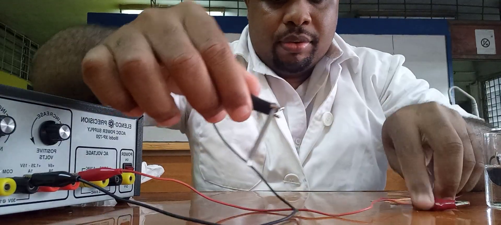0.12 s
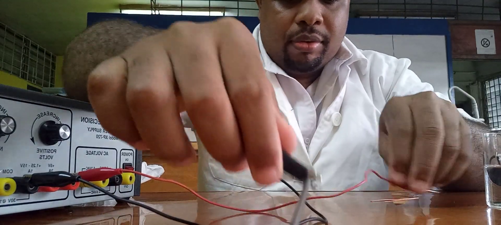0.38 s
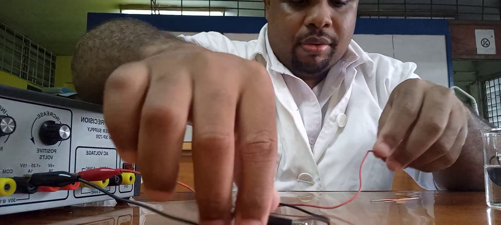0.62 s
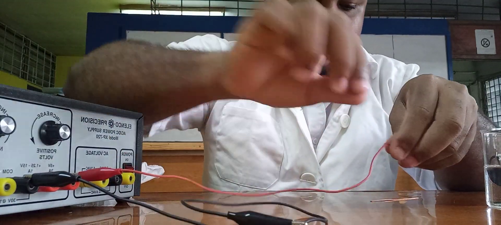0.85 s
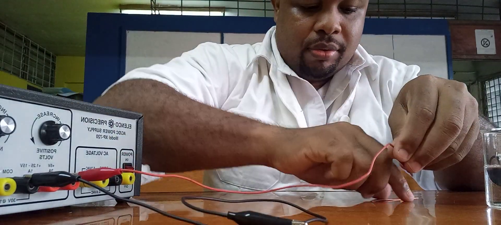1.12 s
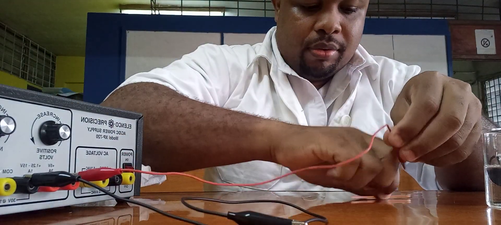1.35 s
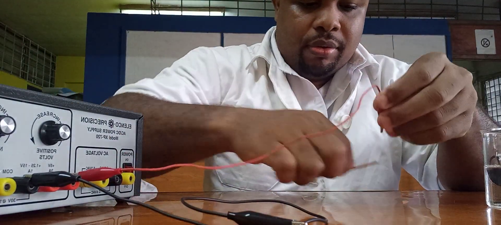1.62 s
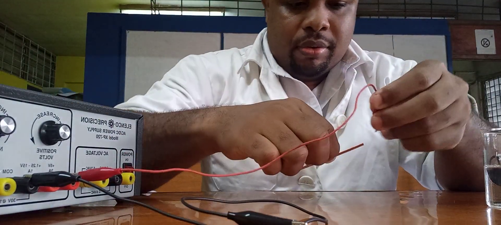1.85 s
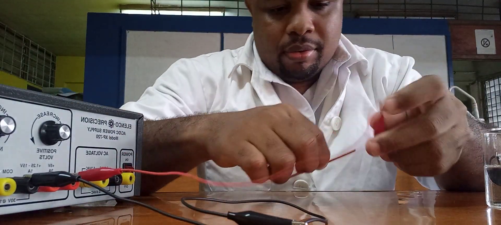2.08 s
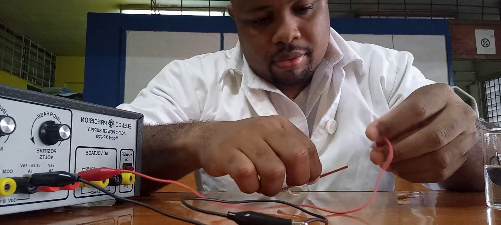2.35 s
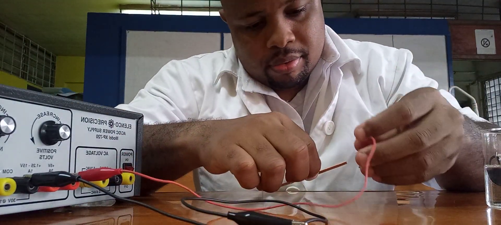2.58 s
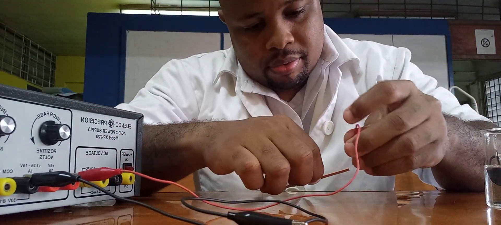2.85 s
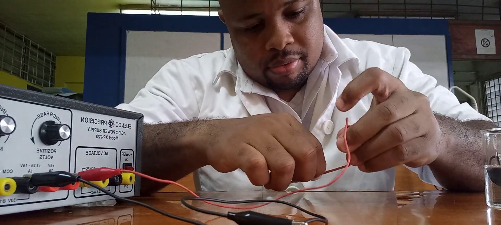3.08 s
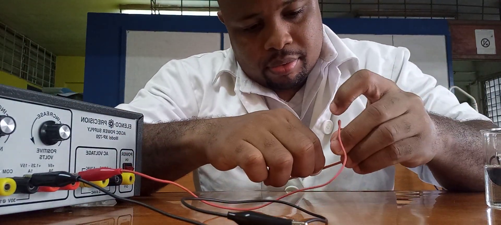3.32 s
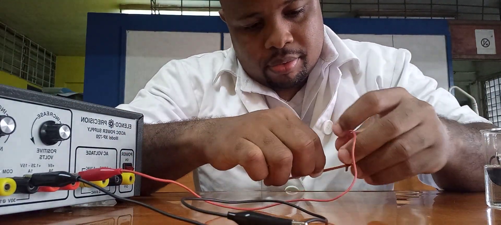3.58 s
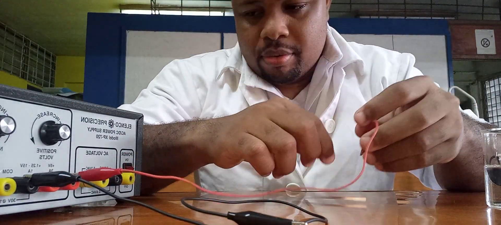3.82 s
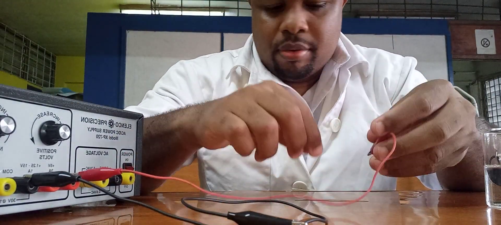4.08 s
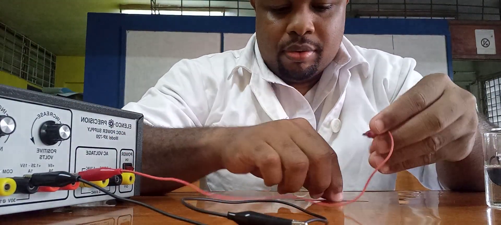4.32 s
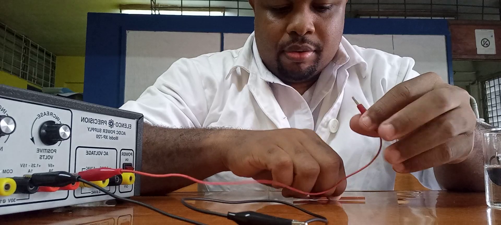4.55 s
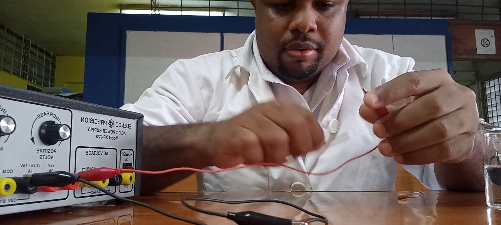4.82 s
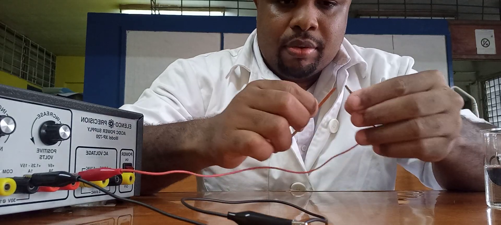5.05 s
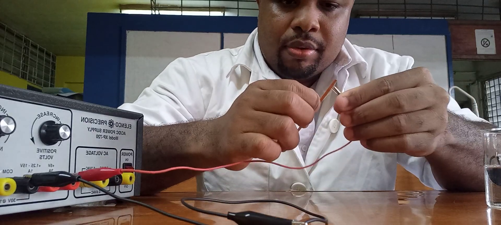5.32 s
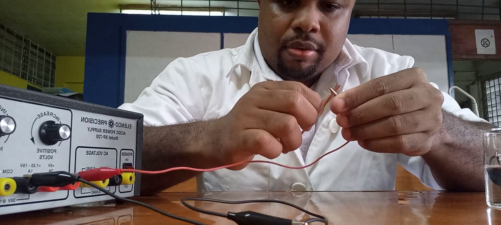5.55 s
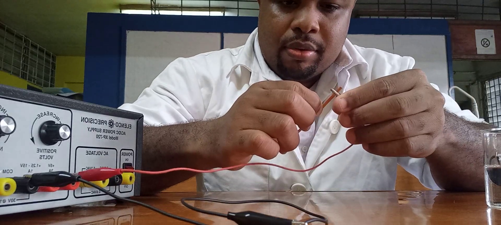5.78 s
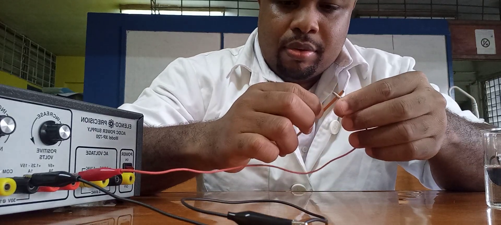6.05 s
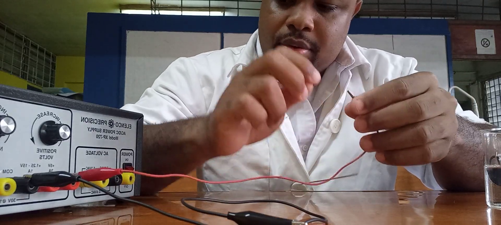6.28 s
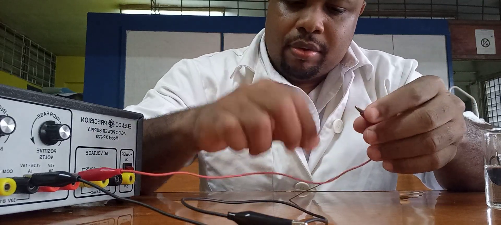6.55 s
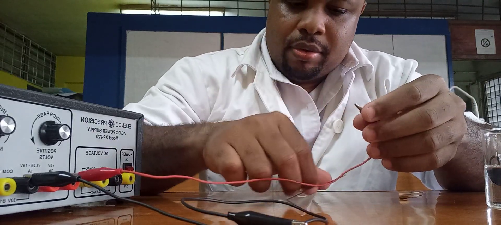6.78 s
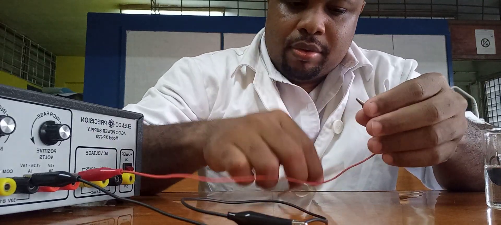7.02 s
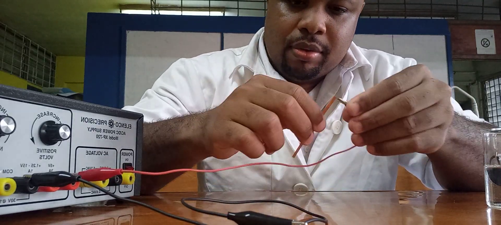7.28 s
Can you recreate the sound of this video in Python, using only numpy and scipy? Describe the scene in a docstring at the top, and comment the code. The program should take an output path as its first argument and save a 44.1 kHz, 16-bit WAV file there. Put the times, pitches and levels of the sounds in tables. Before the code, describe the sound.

A hard-walled lab room, with a stereo microphone close to a wooden bench. Low engine notes and soft tyre roar come through the walls throughout, over very faint hiss. At 0.3 s tiny metal ticks and a brief scrape; at 0.45 s a nail drops with a bright click and rapidly shrinking bounces, and at 0.57 s a clip knocks woodily. Small ticks and a light metal drag follow at 1.25-1.4 s, then barely audible handling around 1.8-2.2 s. From about 3 s a nearer engine slides down in pitch and settles into a throbbing idle. At 3.85-4.1 s a copper strip falls, with a loud sharp hit at 3.89 s, rattling and scraping. Faint ticks occur near 4.5 and 5.5 s. At 6.23 s clip jaws snap shut, the loudest and crispest click, with an echoing tail; smaller clicks follow at 6.5 s, then faint ticks and scraping until 7.1 s as the drone continues.

```python
"""A wooden lab bench in a hard room, with a phone in front of hands that work with test leads.
A clip and a nail drop, a copper strip falls and rattles, jaws snap shut and small parts tick: blows that excite
click and bench resonances, each louder one with a room tail of decaying noise. Dragged metal is chattering noise.
Street traffic drones and throbs through the walls: wavering sines over shaped noise, above a faint hiss."""
import sys
import numpy as np
from scipy import signal
from scipy.fft import rfft, irfft, next_fast_len
from scipy.io import wavfile
from scipy.ndimage import uniform_filter1d, map_coordinates

SR = 44100
rng = np.random.default_rng(int(sys.argv[2]) if len(sys.argv) > 2 else 0)


def gain_from_db(level_db):
    """Convert decibel levels to linear amplitude factors (20 dB per decade)."""
    decades = np.asarray(level_db, float) / 20
    return 10 ** decades


def int16_out(signal):
    """Quantize to a 16-bit WAV file."""
    q = np.round(np.clip(np.atleast_2d(signal).T, -1, 1) * 32767)
    wavfile.write(sys.argv[1], SR, q.astype(np.int16))


N = 326465  # length in samples

# Faint hiss, relative colour: freq_hz, density_db (per Hz)
HISS_COLOUR = [(1180, -30), (2000, -1), (2280, -6), (2770, -8), (3780, -14), (4160, -11), (5420, -18),
               (6470, -11), (7860, -25), (10500, -22), (11900, -19), (14100, -17), (15900, -21),
               (16500, -34)]
HISS_DB = -78  # rms
# Likeness of left and right in the noise layers: freq_hz, correlation (-1 to 1)
STEREO_LIKENESS = [(60, 0.85), (180, 0.91), (550, 0.52), (1650, -0.76), (4970, 0.73), (15000, 0.37)]

# A near engine slows down, then idles: time_s, pitch_hz, level_db
ENGINE_DRONE = [(2.6, 90.64, -65), (2.95, 88.18, -40.5), (3.07, 84.7, -44.5), (3.12, 85, -41),
                (3.26, 82.3, -44.5), (3.42, 74.39, -37), (3.7, 73.08, -41), (4.1, 71.92, -50.5),
                (4.4, 73.85, -39.5), (4.8, 73.04, -38), (5.2, 74.2, -46), (5.48, 71.83, -41),
                (5.64, 71, -50), (5.8, 72.97, -39.5), (6.18, 72.5, -46.5), (6.3, 73.62, -39),
                (6.62, 72.2, -50.5), (6.74, 73.33, -43), (7.0, 72, -55.5), (7.1, 70.3, -38.5),
                (7.4, 68.76, -39)]
# Engine notes passing by: start_s, end_s, pitch_hz, level_db
ENGINE_NOTES = [(0.146, 0.386, 87.5, -32.5), (0.535, 0.653, 83.5, -30), (0.882, 1.014, 93, -35.5),
                (1.088, 1.434, 93.2, -46.5), (1.496, 1.665, 93, -40.5), (2.298, 2.425, 92, -42),
                (2.437, 2.796, 83, -51), (4.207, 4.966, 83.8, -39), (0.136, 0.462, 123, -45),
                (3.306, 4.103, 115, -52.5), (4.687, 5.815, 147.8, -49), (5.024, 5.6, 357, -57.5),
                (5.787, 6.143, 189.4, -52.5), (6.011, 6.5, 120.8, -50.5), (6.723, 7.12, 164.3, -47),
                (7.198, 7.359, 903, -63)]
NOTE_FADE_S = 0.09
# Traffic roar: time_s, far_engines_db, tyres_db
ROAR_LEVELS = [(0, -41, -45.5), (.5, -45, -48), (.75, -48.5, -49), (1, -48, -51.5), (2.1, -54, -52),
               (2.8, -46.5, -54), (3.5, -41.5, -52.5), (4.1, -47, -50.5), (4.8, -40.5, -48.5),
               (5.6, -44.5, -48.5), (6.2, -44, -53), (6.45, -46.5, -50.5), (6.7, -48.5, -54.5),
               (7.1, -46.5, -55), (7.4, -43.5, -53)]
# Balance of the whole traffic: time_s, left_minus_right_db
TRAFFIC_BALANCE = [(0.0, -1), (1.6, -2), (2.7, -3), (3.4, -0.5), (7.4, -2)]
# Relative colour of the far engines: freq_hz, density_db (per Hz)
FAR_ENGINE_COLOUR = [(15, -54), (25, -37.5), (55, -7.5), (75, -2.5), (113, -4.5), (155, -9.5), (178, -16.5),
                     (246, -23), (356, -30), (400, -20.5), (520, -50.5), (880, -120)]
# Relative colour of the tyre roar: freq_hz, density_db (per Hz)
TYRE_ROAR_COLOUR = [(120, -33.5), (200, -3.5), (221, -3.5), (252, -8.5), (302, -3), (333, -3), (800, -18),
                    (1040, -60), (1760, -120)]
# Relative colour of the tyre swish: freq_hz, density_db (per Hz)
TYRE_SWISH_COLOUR = [(440, -29.5), (750, 0.5), (1370, -7), (1690, -15.5), (1830, -23.5), (2400, -36),
                     (3120, -58), (5280, -120)]
SWISH_DB, SWISH_SWING = -11, 1.2  # mean level against the tyre roar, and how much wider it swings

# Decay of the room: freq_hz, t60_s
ROOM_DECAY = [(300, .6), (1000, .64), (3000, .62), (7000, .58), (9000, .42), (15000, .34)]
# Colour the room adds to a blow: freq_hz, gain_db
ROOM_COLOUR = [(300, 6), (1000, 1.5), (2500, -3), (5000, -2), (8000, -2.5), (15000, -2)]

# Bright resonances of a click at the phone: freq_hz, width_hz, level_db
CLICK_BRIGHT = [(5300, 350, -5), (6300, 550, 0), (7100, 500, -7)]
# Highest resonances of a click, its sheen: freq_hz, width_hz, level_db
CLICK_SHEEN = [(9300, 1500, -3), (11900, 1600, 0), (13500, 1600, -1), (15200, 1400, -3)]
# Lowest resonances of a click, its clank: freq_hz, width_hz, level_db
CLICK_CLANK = [(2400, 420, 0), (2950, 600, -3)]
# Middle resonances of a click at the phone: freq_hz, width_hz, level_db
CLICK_MIDDLE = [(3500, 450, -4), (4250, 550, 0)]
# The loose nail rings more narrowly: freq_hz, width_hz, level_db
NAIL_RING = [(4350, 180, 0), (5620, 180, -3), (7000, 300, -5)]
# Wooden bench resonances: freq_hz, width_hz, level_db
BENCH_KNOCK = [(332, 110, -3.5), (560, 250, -6.5), (770, 260, -0.5), (1217, 200, -2), (2110, 280, -3)]

# Metal dragged on the bench: start_s, end_s, level_db, sheen_db, nail_ring_db
SCRAPES = [(.288, .37, -67, -9, -20), (1.25, 1.43, -61, -1, -20), (3.89, 4.12, -57, -4, -20),
           (1.8, 2.08, -72, -12, -20), (6.845, 6.965, -81, -12, 15), (6.945, 6.978, -77, 4, 12)]
# Small pure tick: start_s, pitch_hz, level_db, t60_s
PURE_TICKS = [(5.473, 3070, -48, 0.0098)]

# The nail drops, then bounces ever faster; each flight is BOUNCE_SHRINK times the one before
NAIL_DROP_S, NAIL_DROP_DB = 0.4483, -16.5
FIRST_FLIGHT_S, BOUNCE_SHRINK = 0.0226, 0.62
FIRST_LOSS_DB, NEXT_LOSS_DB, BOUNCE_TILT_DB = 11, 4, 7
# Clip on the bench: start_s, level_db, low_tilt_db
CLIP_KNOCKS = [(0.3814, -68.5, -1), (0.566, -22, -5), (0.5939, -35, 2), (0.6099, -43, 1)]
# Copper strip: start_s, level_db, low_tilt_db
STRIP_RATTLE = [(3.8454, -22, -1), (3.8866, -10.5, -4), (3.8948, -22, 2.5), (3.927, -23.5, -3),
                (3.9393, -31.5, 14.5), (3.961, -34.5, -0.5), (3.9704, -24.5, 6), (3.9945, -23, -4),
                (3.9999, -26.5, 0), (4.006, -31, 6.5), (4.0366, -20, -4.5), (4.0544, -24.5, -0.5),
                (4.0689, -36, -1), (4.0738, -28.5, 1), (4.0894, -36.5, 8.5)]
# Clip jaws: start_s, level_db, low_tilt_db
JAW_SNAPS = [(6.2282, -5, 3), (6.2446, -31.5, -4), (6.4666, -30.5, 8), (6.5183, -34.5, 1),
             (6.536, -37.5, 2)]
# Small parts: start_s, level_db, low_tilt_db
PART_TICKS = [(0.2918, -43, -2), (0.299, -50, 0), (0.3134, -52, 2), (0.3206, -46, 2), (0.717, -50, 2),
              (1.2527, -50, -2), (1.2758, -39, -3), (1.3004, -46, 0), (1.8885, -46, -12), (2.02, -63, 4),
              (2.105, -62, -2), (2.2228, -60, -6), (4.4348, -61, 2), (4.5243, -62, 0), (6.7171, -61, 0),
              (6.8694, -56, -2), (7.0608, -63, -8)]
# Shares of a blow against the bright resonances: knock_db, clank_db, middle_db, sheen_db
NAIL_SHARES, CLIP_SHARES, STRIP_SHARES = (2, -14.5, -1, 1), (17.5, -2, 7, 4.5), (-9.5, -9, -3.5, 1.5)
JAW_SHARES, TICK_SHARES = (-13, -8.5, -7, -9), (-1, -11.5, -2.5, -8)
SHARE_SCATTER_DB = 3.18

# Where the hands work: time_s, left_lag_ms, left_minus_right_db
HAND_PLACE = [(0.3, -0.36, -6), (0.452, 0.0089, 7.5), (.6, 0.015, -18), (1.3, -0.32, 4.5), (3.5, 0.39, 7.5),
              (4.499, 0.44, 4), (6.2, 0.23, -4.5), (6.899, 0.59, -15)]
# Near sounds at the two microphones: freq_hz, left_minus_right_db
MICROPHONE_BALANCE = [(60, 0.0), (110, 0.0), (200, 0.0), (380, 1.5), (700, -1.5), (1290, -9.0), (2380, 3.5),
                      (4400, 0.5), (8120, 3.5), (15000, -0.5)]
# Steep limit of the top treble: freq_hz, gain_db
TREBLE_LIMIT = [(15700, 0), (16000, -9), (16700, -16), (17000, -50)]


def unit(x):
    """Scales to rms 1."""
    return x / np.sqrt(np.mean(x ** 2) + 1e-20)


def peak_one(x):
    """Scales to peak 1."""
    return x / np.max(np.abs(x))


def along(points, hz):
    """Reads (freq_hz, value) points on a log frequency axis."""
    f, v = np.transpose(points)
    return np.interp(np.log(hz + 1), np.log(f + 1), v)


def curves(rows):
    """Draws one value per sample for each column after the time."""
    s, *cols = np.transpose(rows)
    return [np.interp(np.arange(N) / SR, s, c) for c in cols]


def wobble(rate_hz):
    """Draws a smooth random curve with rate_hz knots a second."""
    knots = rng.standard_normal(int(N * rate_hz / SR) + 4)
    return map_coordinates(knots, [np.arange(N) * rate_hz / SR])


def filtered(x, response):
    """Filters x by a complex response of frequency."""
    m = next_fast_len(x.shape[-1] + 8192)
    spectrum = rfft(x, m) * response(np.fft.rfftfreq(m, 1 / SR))
    return irfft(spectrum, m)[..., :x.shape[-1]]


def resonances(modes, scatter_db):
    """Causal response of damped modes of alternating sign, each struck at a new strength."""
    gains = [gain_from_db(db + scatter_db * rng.standard_normal()) for _, _, db in modes]

    def response(f):
        total = 0
        for k, (centre, width, _) in enumerate(modes):
            damping = 1j * f * width
            total = total + (-1) ** k * gains[k] * damping / (centre * centre - f * f + damping)
        return total
    return response


def rush(colour, patchy_db):
    """Coloured stereo noise of rms 1, with smooth patches of random gain over time and pitch."""
    z = signal.stft(rng.standard_normal((2, N)), nperseg=512)[2]
    patches = uniform_filter1d(rng.standard_normal(z.shape[1:]), size=5, axis=0)
    patches = uniform_filter1d(patches, size=12, axis=1)
    pair = signal.istft(z * gain_from_db(patchy_db * unit(patches)), nperseg=512)[1][:, :N]

    def mid_side_response(hz):
        angle = np.arccos(np.clip(along(STEREO_LIKENESS, hz), -1, 1)) / 2
        return gain_from_db(along(colour, hz)) * np.array([np.cos(angle), np.sin(angle)])
    mid, side = filtered(pair, mid_side_response)
    return unit(np.array([mid + side, mid - side]))


def hiss():
    """Steady faint noise, coloured across the spectrum."""
    return gain_from_db(HISS_DB) * rush(HISS_COLOUR, patchy_db=0.5)


def engines():
    """Sines whose level and phase wander at random, so the engine notes waver and throb."""
    t = np.arange(N) / SR
    hz, db = curves(ENGINE_DRONE)
    turns = np.cumsum(hz) / SR
    drone = gain_from_db(db + 1.5 * wobble(11)) * np.sqrt(2) * np.sin(2 * np.pi * turns + 0.9 * wobble(9))
    for start, end, note_hz, note_db in ENGINE_NOTES:
        ramp = np.clip(np.minimum(t - start, end - t) / NOTE_FADE_S, 0, 1)
        swell = np.sin(np.pi / 2 * ramp) ** 2
        level = gain_from_db(note_db + 1.2 * wobble(7)) * swell
        drone = drone + level * np.sqrt(2) * np.sin(2 * np.pi * note_hz * t + 0.48 * wobble(10))
    return drone


def traffic():
    """Engine notes over the noise of far engines, tyre roar and the wider-swinging tyre swish."""
    low_db, mid_db = curves(ROAR_LEVELS)
    swish_db = mid_db.mean() + SWISH_DB + SWISH_SWING * (mid_db - mid_db.mean())
    far_engines = gain_from_db(low_db + 1.7 * wobble(7.5)) * rush(FAR_ENGINE_COLOUR, patchy_db=1.0)
    tyre_roar = gain_from_db(mid_db + 0.23 * wobble(6.9)) * rush(TYRE_ROAR_COLOUR, patchy_db=1.04)
    tyre_swish = gain_from_db(swish_db + 0.98 * wobble(8.5)) * rush(TYRE_SWISH_COLOUR, patchy_db=2.0)
    pan_db = curves(TRAFFIC_BALANCE)[0]
    return (engines() + far_engines + tyre_roar + tyre_swish) * gain_from_db([pan_db / 2, -pan_db / 2])


def room(parts):
    """Stereo noise tail in the blurred colour of the parts; it builds up, then each pitch dies at its own speed."""
    hz, t, z = signal.stft(rng.standard_normal((2, SR)), SR, nperseg=512)
    power = uniform_filter1d(sum(np.abs(rfft(part)) ** 2 for part in parts), size=65)
    power = np.interp(hz, np.linspace(0, SR / 2, len(power)), power)
    colour = np.sqrt(np.abs(power)) * gain_from_db(along(ROOM_COLOUR, hz))
    decay = gain_from_db(-60 * t / along(ROOM_DECAY, hz)[:, None])
    tail = signal.istft(z * colour[:, None] * decay, SR, nperseg=512)[1][:, :SR]
    # silent for 5 ms, then builds up over the first reflections
    return tail * np.clip((np.arange(SR) / SR - 0.005) / 0.017, 0, 1)


def scrapes():
    """Dragged metal chatters: spiky noise through click and bench resonances; strokes start fast and fade."""
    t, out = np.arange(N) / SR, np.zeros((2, N))
    for start, end, db, sheen_db, nail_db in SCRAPES:
        k = slice(round(start * SR), round(end * SR))
        progress = (t[k] - start) / (end - start)
        chatter = rng.standard_normal((2, k.stop - k.start)) * gain_from_db(3.5 * wobble(160)[k])
        parts = [(CLICK_CLANK + CLICK_MIDDLE + CLICK_BRIGHT, 0), (CLICK_SHEEN, sheen_db),
                 (NAIL_RING, nail_db), (BENCH_KNOCK, -3)]
        ring = sum(gain_from_db(part_db) * unit(filtered(chatter, resonances(modes, scatter_db=1.5)))
                   for modes, part_db in parts)
        stroke = np.clip(progress / 0.05, 0, 1) * (1 - np.abs(progress) ** 1.5)
        out[:, k] += gain_from_db(db) * stroke * ring
    return out


def pure_ticks():
    """A small tick is one decaying sine with a very short rise."""
    t, out = np.arange(2048) / SR, np.zeros((2, N))
    for s, hz, db, t60 in PURE_TICKS:
        k = round(s * SR)
        rise = 1 - np.exp(-t / 0.00027)
        out[:, k:k + len(t)] += gain_from_db(db - 60 * t / t60) * np.sin(2 * np.pi * hz * t) * rise
    return out


def nail_bounces():
    """The nail's drop and five bounces, each flight shorter and each landing weaker than the last."""
    rows = [(NAIL_DROP_S, NAIL_DROP_DB, 0)]
    for k in range(1, 6):
        s = NAIL_DROP_S + FIRST_FLIGHT_S * (1 - BOUNCE_SHRINK ** k) / (1 - BOUNCE_SHRINK)
        rows.append((s, NAIL_DROP_DB - FIRST_LOSS_DB - NEXT_LOSS_DB * (k - 1), BOUNCE_TILT_DB))
    return rows


def blows():
    """Lists every contact with its object's shares, tilted and scattered at random."""
    objects = [(nail_bounces(), NAIL_SHARES), (CLIP_KNOCKS, CLIP_SHARES), (STRIP_RATTLE, STRIP_SHARES),
               (JAW_SNAPS, JAW_SHARES), (PART_TICKS, TICK_SHARES)]
    out = []
    for rows, shares in objects:
        for s, db, tilt_db in rows:
            tilt = np.multiply(tilt_db, [0.64, 0.96, 0.98, 0.31])  # knock, clank, middle, sheen
            out.append((s, db, *(np.add(shares, tilt) + SHARE_SCATTER_DB * rng.standard_normal(size=4))))
    return out


def bench_push(t):
    """The double push that knocks the bench, built of short half sines."""
    def half_sine(start, length):
        return np.sin(np.pi * np.clip((t - start) / length, 0, 1))
    return half_sine(0.0006, 0.0004) - 0.4 * half_sine(0.0001, 0.0005) + 0.4 * half_sine(0.0028, 0.0003)


def contacts():
    """A sharp blow with a little rattle excites the click resonances while a double push knocks the bench."""
    near, far = np.zeros((2, N + 2 * SR)), np.zeros((2, N + 2 * SR))
    t = np.arange(2048) / SR
    push = bench_push(t)
    blow = (t == 0) * 1.0
    when, lags_ms, pans_db = np.transpose(HAND_PLACE)
    for s, db, knock_db, clank_db, middle_db, sheen_db in blows():
        rattle = blow + 0.24 * rng.standard_normal((2, len(t))) * np.exp(-t / 0.0009)
        parts = [(CLICK_BRIGHT, 0), (CLICK_CLANK, clank_db), (CLICK_MIDDLE, middle_db), (CLICK_SHEEN, sheen_db)]

        def ring(x, scatter_db):
            return [gain_from_db(part_db) * peak_one(filtered(x, resonances(modes, scatter_db)))
                    for modes, part_db in parts]
        knock = gain_from_db(knock_db) * peak_one(filtered(push, resonances(BENCH_KNOCK, scatter_db=2.5)))
        lag_s = np.interp(s, when, lags_ms) / 1000
        pan_db = np.interp(s, when, pans_db)
        starts = [round((s + max(lag_s, 0)) * SR), round((s - min(lag_s, 0)) * SR)]
        click = sum(ring(rattle, scatter_db=5.0)) * gain_from_db([[pan_db / 2], [-pan_db / 2]])
        hit = gain_from_db(db) * (click + knock)
        for ear, k in enumerate(starts):
            near[ear, k:k + len(t)] += hit[ear]
        if db > -48:  # weaker contacts get no tail
            # the walls hear the object from every side, so its colour evens out
            tail = room(ring(blow, scatter_db=0.5) + [knock])
            far[:, starts[0]:starts[0] + SR] += gain_from_db(db - 38) * tail
    return near[:, :N], far[:, :N]


def scene():
    """Near contacts reach two microphones through the phone's body; room and street come from all round."""
    def phone_body(hz):
        return gain_from_db(np.outer([0.5, -0.5], along(MICROPHONE_BALANCE, hz)))
    near, far = contacts()
    return hiss() + traffic() + scrapes() + far + filtered(near + pure_ticks(), phone_body)


def low_pass(x):
    """Removes everything above the highest recorded frequency."""
    return signal.sosfilt(signal.butter(12, 17080, fs=SR, output="sos"), x)


def record(dry):
    """The top treble is cut off steeply."""
    mix = filtered(dry, lambda hz: gain_from_db(along(TREBLE_LIMIT, hz)))
    return low_pass(mix)


dry = scene()
out = record(dry)
int16_out(out)
```